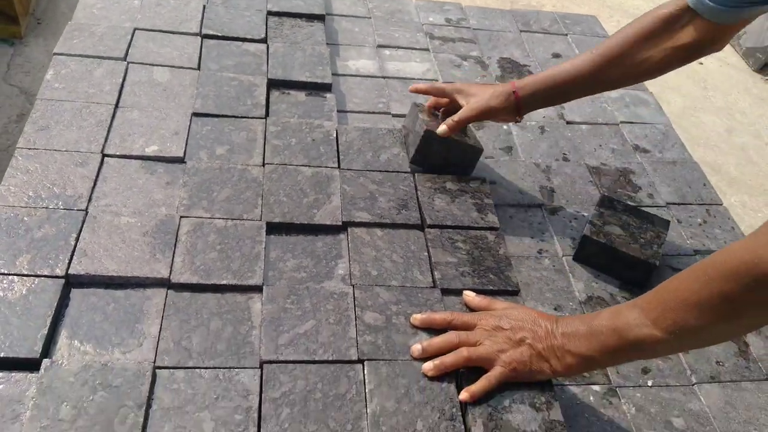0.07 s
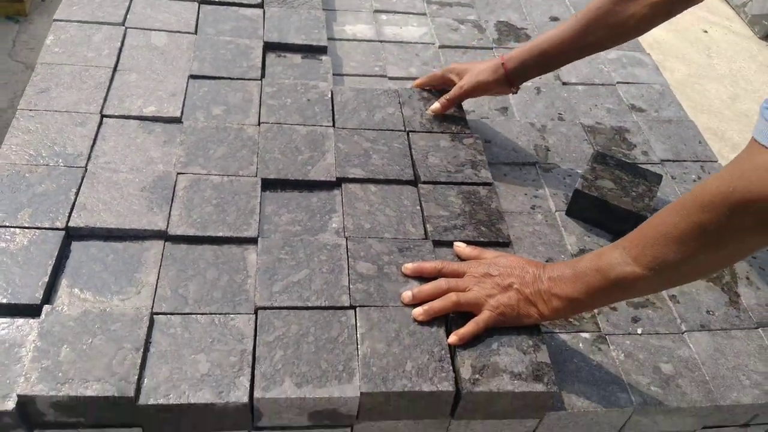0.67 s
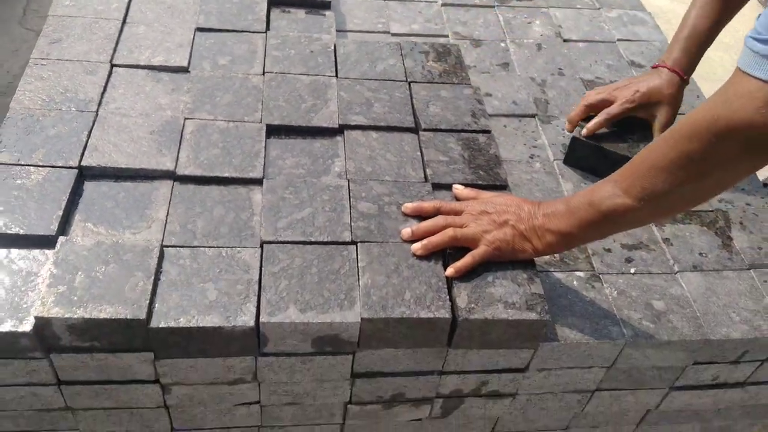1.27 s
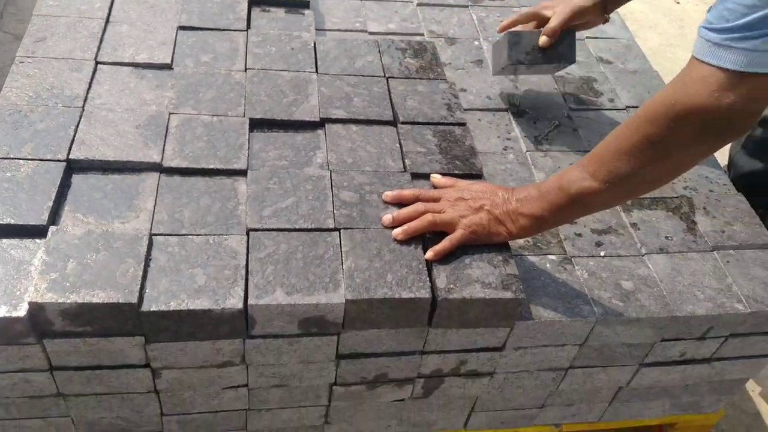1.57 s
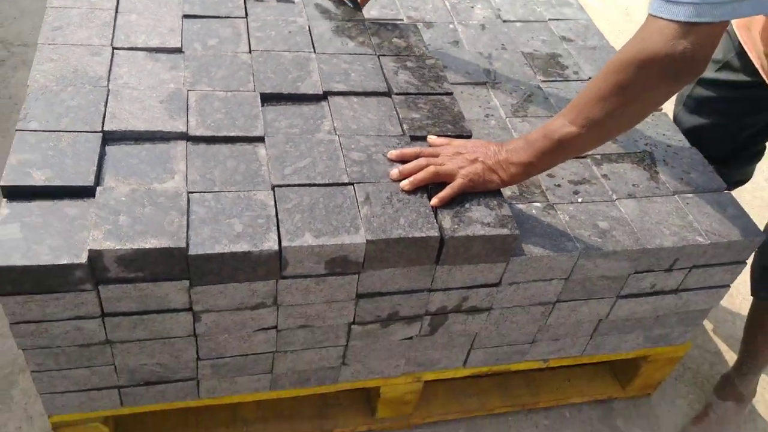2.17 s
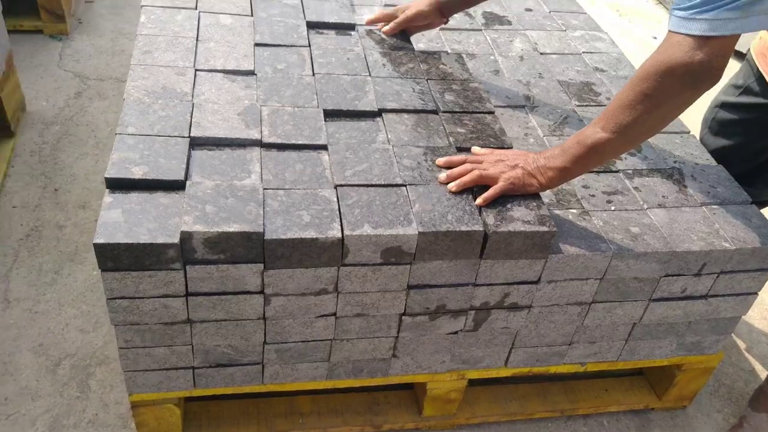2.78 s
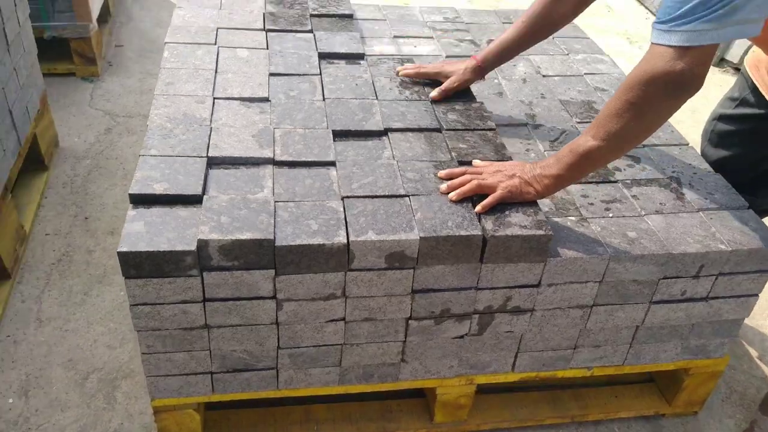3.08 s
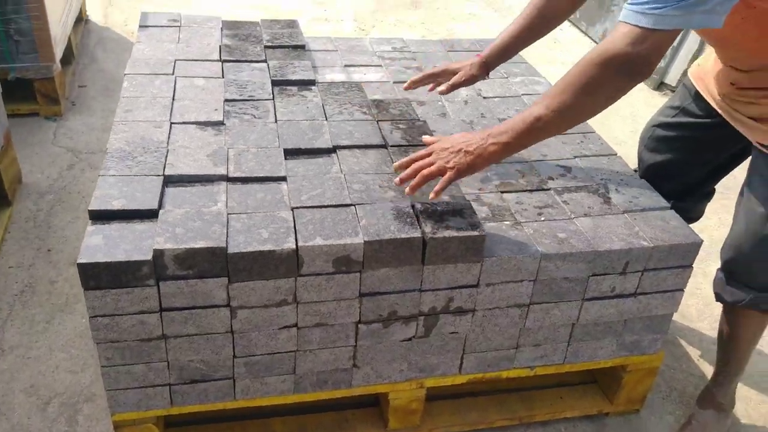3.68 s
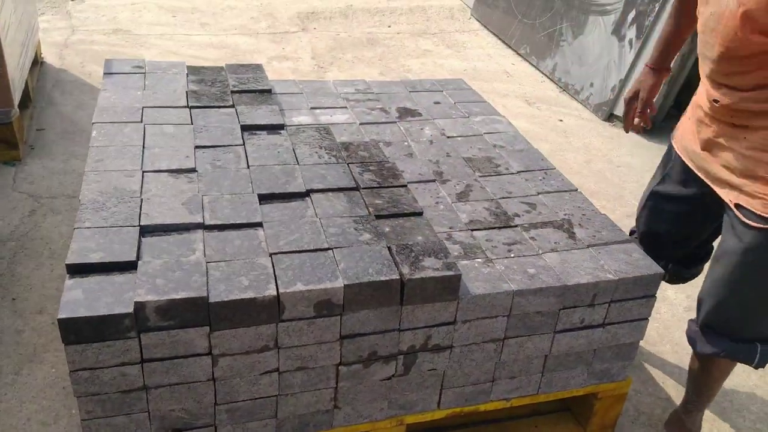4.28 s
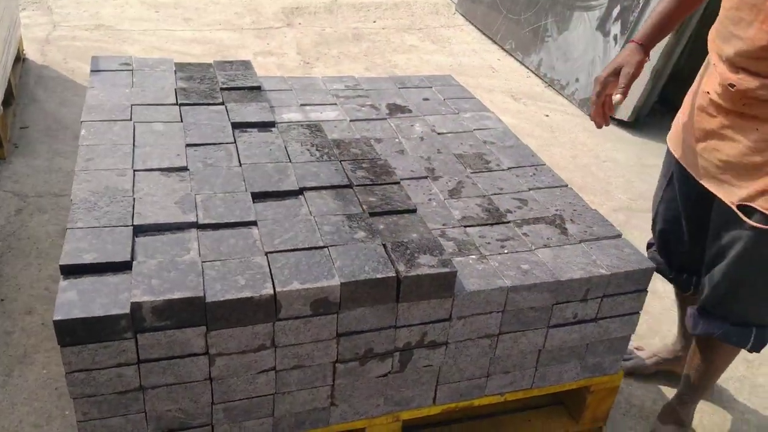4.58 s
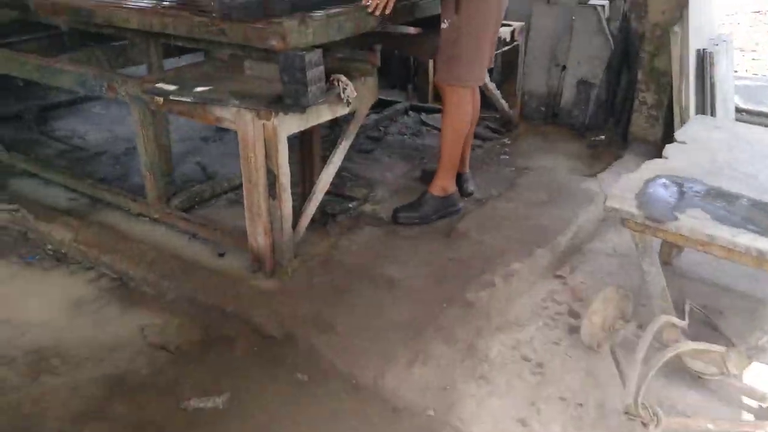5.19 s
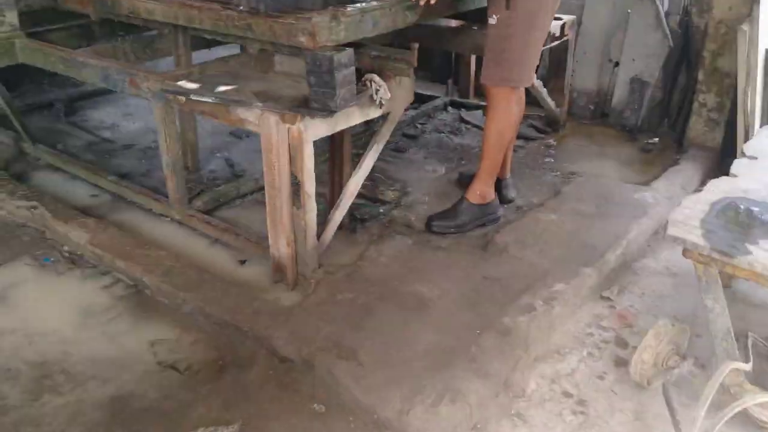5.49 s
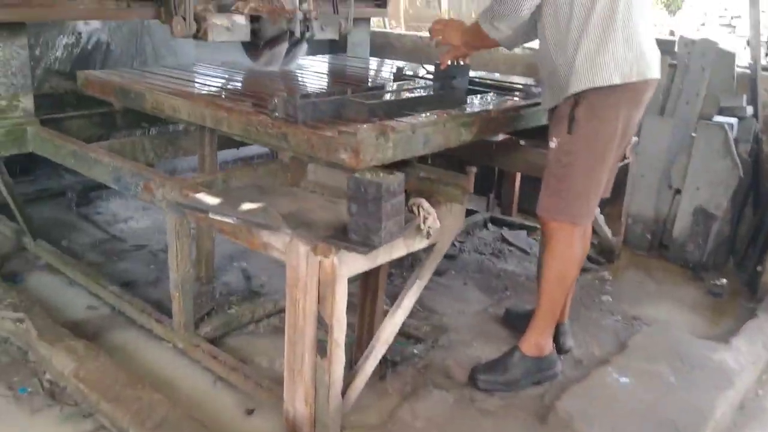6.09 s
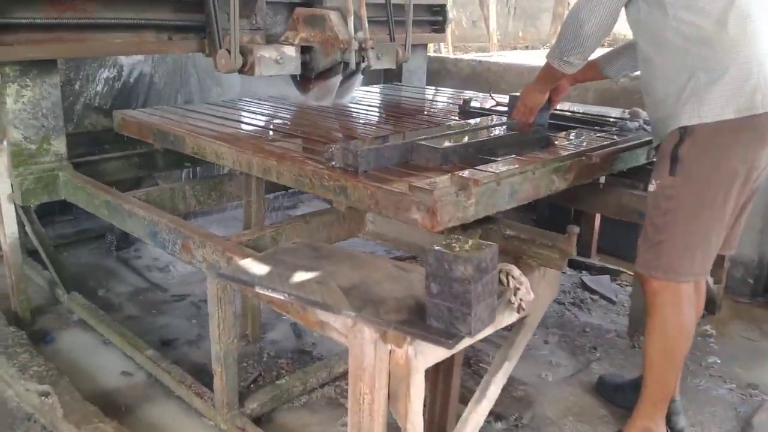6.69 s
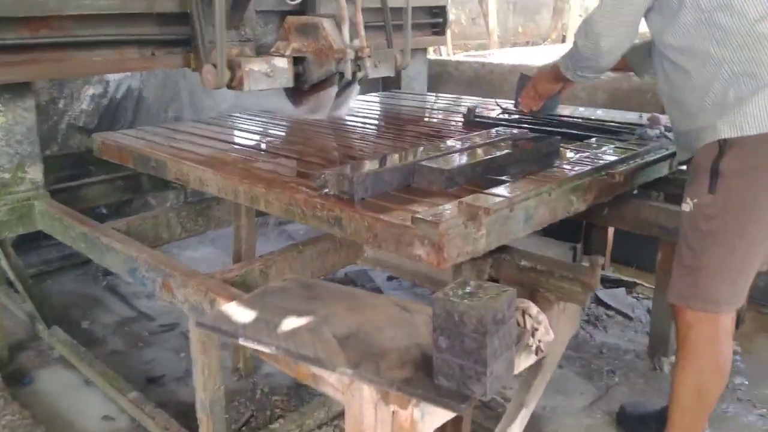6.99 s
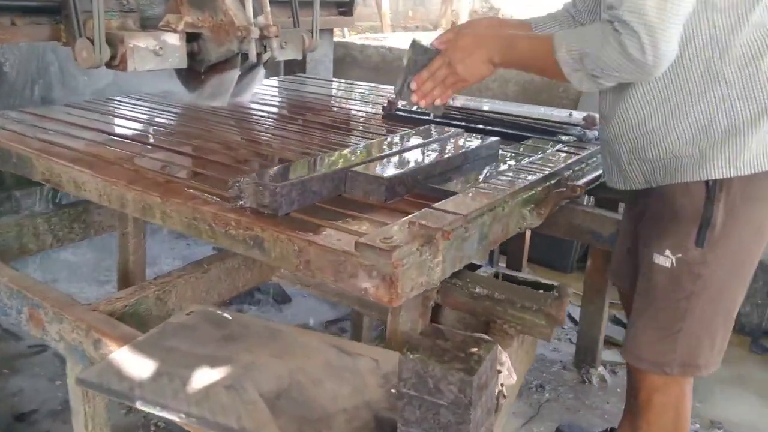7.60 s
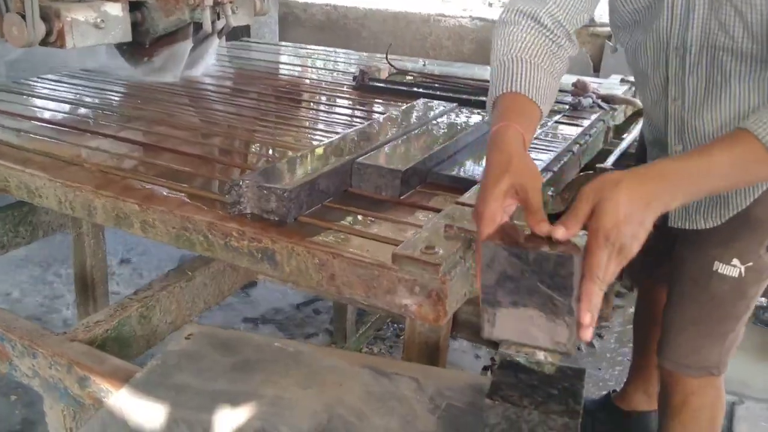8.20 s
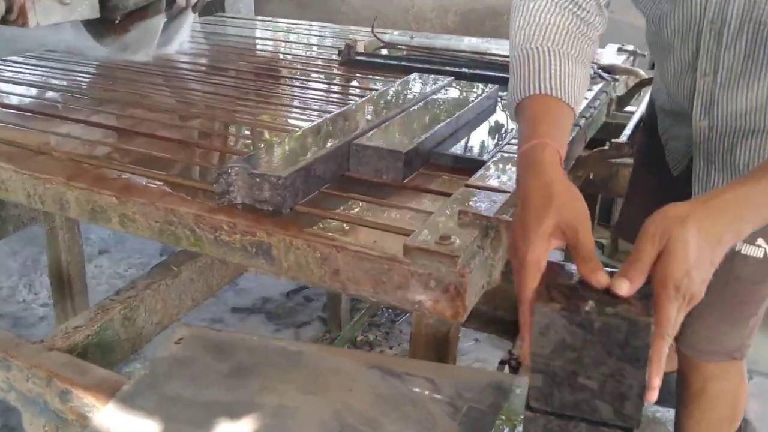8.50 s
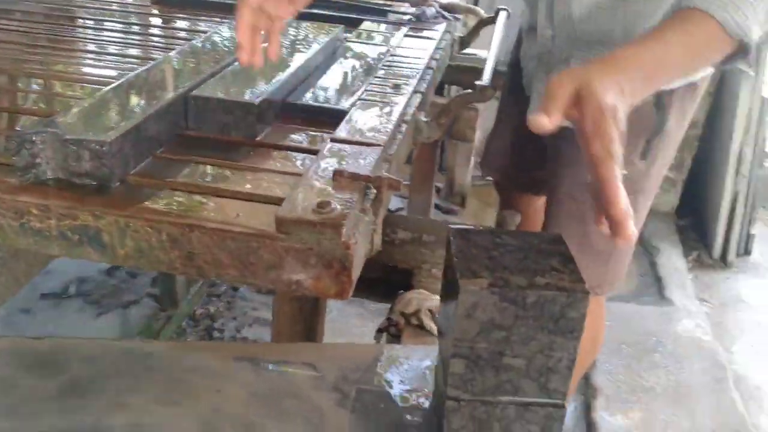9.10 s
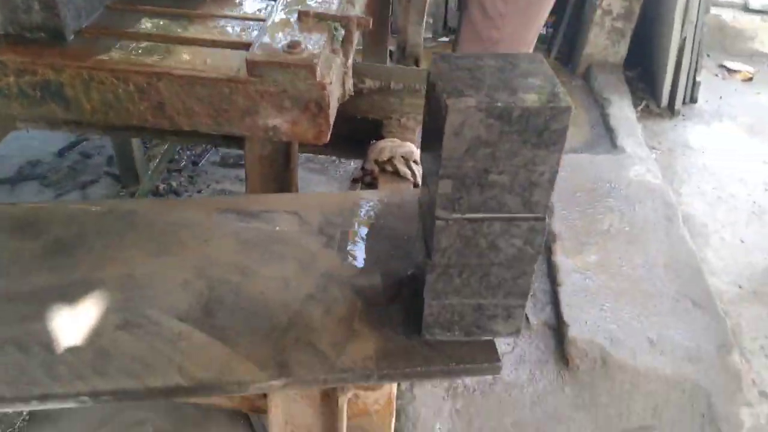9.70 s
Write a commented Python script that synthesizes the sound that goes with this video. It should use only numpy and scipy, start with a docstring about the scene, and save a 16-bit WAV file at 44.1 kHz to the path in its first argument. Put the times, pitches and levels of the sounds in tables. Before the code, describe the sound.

A wet circular saw cuts stone for the whole ten seconds. Its steel blade sings one high, fluttering note that flares into short, irregular squeals several times a second, with a few faint thinner squeaks. Underneath are rasping grit, a mid-pitched drone of worn bearings, a bright water hiss and a faint low rattle and hum. At first it is heard from a yard with slight wind rumble. Stone paving blocks clack at 0.3 seconds, one slides with a brief hiss at 0.8 and taps down, and the loudest clack comes at 2.2. From 4.5 to 5.7 seconds the microphone moves beside the saw in an open shed, with two lighter knocks around 4.8. Grinding and spray are now stronger, surging as the teeth bite. Strong squeals come around 4.3, 6, 6.9 and 9.5 seconds. Two more blocks knock lightly at 9.4 and 9.8 as the cut continues.

```python
"""A wet circular saw cuts stone in an open shed, heard first from the yard. From the start the steel blade
sings near 2.2 kHz and squeals when it binds; grit rasps, worn bearings drone and cooling water hisses off
the rim. In the first seconds paving blocks clack onto a pallet and one slides, over a little wind.
From 4.5 to 5.7 s we move up beside the saw table, where grinding and spray are stronger.
The cut goes on, and two more blocks knock just before the end."""
import sys
import numpy as np
from scipy import signal
from scipy.fft import rfft, irfft
from scipy.io import wavfile
from scipy.ndimage import uniform_filter1d, map_coordinates

SR = 44100
rng = np.random.default_rng(int(sys.argv[2]) if len(sys.argv) > 2 else 0)


def put_to_file(sound):
    """Save the sound as 16-bit audio at rate SR, in the file named by the first command-line argument."""
    columns = np.atleast_2d(sound).T  # one column per channel
    safe = np.clip(columns, -1, 1)
    whole_steps = np.round(safe * 32767)
    wavfile.write(sys.argv[1], SR, whole_steps.astype(np.int16))


N = 434385
TIME = np.arange(N) / SR
FREQ = np.maximum(np.arange(N // 2 + 1) * SR / N, 1)
MOVE_S = (4.5, 5.7)  # start and end of the move from yard to saw table

# A gain_db compares parts of one sound; a level_db says how strong it is before the final limiting.
# the blade's singing between squeals: time_s, level_db
SING_LEVEL = [(0, -27), (.3, -21), (.7, -24.5), (1.1, -23.5), (1.4, -17), (1.8, -32), (2.0, -20.5),
              (2.7, -17), (2.9, -29), (3.3, -29), (3.5, -21), (4.37, -24), (4.6, -21), (5.2, -20),
              (5.7, -25), (6.4, -20.5), (8.0, -18.5), (8.8, -20.5), (9.4, -15.5), (9.7, -24)]
# the blade's note, shifting with the load: time_s, pitch_hz
SING_PITCH = [(0, 2217), (1.0, 2215), (1.3, 2210), (3.15, 2215), (3.6, 2205), (4.1, 2215), (5.4, 2218),
              (6.3, 2213), (7.45, 2212), (7.75, 2224), (8.05, 2215), (8.55, 2223), (9.0, 2214),
              (9.85, 2213)]
# squeals when the blade binds in the slot: start_s, length_s, level_db
SQUEALS = [(0.249, 0.13, -15.5), (0.389, 0.098, -13.5), (0.514, 0.15, -15), (0.733, .17, -15.5),
           (1.231, 0.14, -15.5), (1.88, 0.073, -21), (1.973, 0.025, -13), (2.076, 0.066, -17),
           (2.266, 0.17, -14.5), (2.5, .06, -13), (2.705, 0.13, -17.5), (2.916, 0.12, -17.5),
           (3.057, .11, -14), (3.179, 0.075, -12), (3.325, 0.067, -16.5), (3.432, 0.041, -14.5),
           (3.549, 0.18, -15), (3.88, 0.048, -16), (3.97, 0.094, -14.5), (4.123, 0.066, -16),
           (4.254, 0.098, -9), (4.415, 0.25, -17), (4.565, 0.045, -18), (4.625, .03, -15.5),
           (4.658, 0.044, -12.5), (4.762, 0.031, -12), (4.88, 0.12, -14.5), (5.23, 0.037, -16),
           (5.376, 0.026, -18), (5.745, 0.16, -12.5), (6.018, 0.17, -9.5), (6.485, 0.1, -15.5),
           (6.646, 0.14, -12), (6.845, 0.22, -11), (7.086, 0.087, -16.5), (7.31, .06, -13.5),
           (7.665, 0.22, -14.5), (7.885, 0.26, -16.5), (8.392, 0.051, -17), (8.49, .11, -16.5),
           (9.03, .045, -23), (9.15, 0.12, -16.5), (9.47, .22, -10.5), (9.71, 0.033, -14.5),
           (9.778, 0.13, -13)]
# thin squeaks of the blade: start_s, length_s, level_db, pitch_hz
SQUEAKS = [(3.185, 0.085, -44, 5510), (3.302, 0.04, -46, 5600), (3.53, 0.29, -53, 4447),
           (4.35, .36, -42, 3140), (5.419, .4, -56, 4712), (7.101, 0.2, -52, 4690)]
# strength of each part of the cut: time_s, grinding_db, motor_bearing_db, spindle_bearing_db, spray_db
CUT_LEVELS = [(0, -24.5, -34, -31, -34.5), (.35, -26.5, -35, -33.5, -37.5), (.5, -25.5, -33.5, -31, -35.5),
              (1.8, -25.5, -33.5, -31.5, -35), (2.8, -24.5, -33, -31, -35), (3.27, -27, -40.5, -32, -36),
              (3.43, -24, -33, -29.5, -34), (4.15, -26, -33, -31, -35), (4.68, -24.5, -35.5, -33, -37),
              (4.9, -22, -33.5, -30.5, -31.5), (5.55, -21.5, -31.5, -33, -31.5),
              (5.85, -21.5, -36.5, -32.5, -32.5), (6.4, -21, -34, -29.5, -30),
              (7.0, -23.5, -36, -33.5, -33), (7.45, -18.5, -32.5, -30.5, -29.5),
              (7.85, -22.5, -37.5, -34.5, -34.5), (8.4, -20.5, -33, -32, -31.5),
              (9.1, -21, -33.5, -35.5, -33.5), (9.85, -20, -37, -31, -33)]
# moments when the teeth bite deeper: start_s, length_s, boost_db
BITES = [(4.13, 0.27, 2), (4.406, 0.13, 2.5), (4.86, 0.072, 1), (5.417, 0.14, 2), (5.59, 0.09, 3.5),
         (5.935, 0.095, 2.5), (6.304, 0.2, 2.5), (6.782, 0.13, 2), (7.22, 0.067, 1.5), (7.39, .09, 0.5),
         (7.58, 0.11, 2.5), (7.85, 0.032, 4), (8.018, 0.072, 2), (8.318, .09, 3), (8.453, 0.063, 2),
         (8.718, .08, 1.5), (9.202, 0.035, 3), (9.41, .07, 2), (9.71, 0.084, 2)]
# the blade's modes (its natural notes), rung by grit: pitch_hz, width_hz, gain_db
BLADE_MODES = [(1777, 53, -9.5), (1843, 32, -6), (1939, 26, -3.5), (2060, 52, 1), (2132, 104, -3),
               (2234, 126, -3), (2365, 52, -18)]
# rasp of the teeth in the slot: frequency_hz, gain_db
RASP_SPECTRUM = [(1250, -36), (1500, -8.5), (1660, -8.5), (1850, -9), (2150, 3.5), (2400, -0.5), (2530, -8),
                 (2700, -8.5), (2850, -13), (3130, -18), (3450, -19.5), (4100, -25.5), (5200, -34.5),
                 (7000, -35)]
# faint upper tones of the blade: pitch_hz, gain_db
BLADE_OVERTONES = [(2885, -6), (2985, 1.5), (3105, -20), (4226, -8.5), (4447, -3.5), (4673, -10),
                   (4712, -7)]
# motor bearing tones, with neighbours one shaft turn rate apart: pitch_hz, gain_db
MOTOR_TONES = [(718.7, -17), (734.8, -1.5), (757.7, -1), (773.8, -23), (800.8, 0), (816.9, -2),
               (833.1, -14), (876.1, -2.5), (892.3, -5.5), (908.4, 0)]
# tones of the bearing on the spindle, the blade's shaft: pitch_hz, gain_db
SPINDLE_TONES = [(1057.8, -12), (1074, -4), (1090.1, -9), (1104.9, -7.5), (1114.3, -4), (1131.8, -3),
                 (1152, -0.5), (1174.9, -22), (1219.3, -27), (1228.7, -3), (1246.2, -15.5)]
# noise of the motor bearing's housing: frequency_hz, gain_db
MOTOR_HOUSING = [(540, -14), (660, -13.5), (740, -0.5), (900, 0.5), (970, -11), (1050, -34)]
# noise of the spindle bearing's housing: frequency_hz, gain_db
SPINDLE_HOUSING = [(900, -19.5), (1020, -7.5), (1110, 2.5), (1220, -2), (1300, -6), (1480, -7), (1750, -11)]
# hiss of the water: frequency_hz, gain_db
SPRAY_SPECTRUM = [(3500, -18), (4700, -8.5), (5300, -8), (6000, -5), (6700, -4.5), (7500, -2), (8050, 0),
                  (8500, -2.5), (9100, -6.5), (10800, -5.5), (12200, -3), (13500, -.5), (14600, .9),
                  (15900, 1)]
# ringing of the blade guard: time_s, level_db
GUARD_LEVEL = [(0, -30), (.7, -41), (1.15, -31), (1.7, -39), (2.4, -28), (3.7, -42), (4.2, -29.5),
               (5.4, -30), (5.9, -44), (6.3, -36), (7, -61), (9.85, -42)]
# low tones of the saw frame: pitch_hz, gain_db
FRAME_TONES = [(153.4, 0.5), (253, -3), (272, -29), (309.5, -1.5), (331, -14), (362, 1), (378.2, -14.5),
               (414.5, -1.5), (545, -21), (600, -1.5), (620.4, 3), (669, 1)]
# noise of the rattling frame: frequency_hz, gain_db
RATTLE_SPECTRUM = [(70, -12), (130, -4), (240, -1), (340, 3), (470, -4.5), (600, 4), (800, 3.5),
                   (1200, -26)]
# strength of the frame's rattle: time_s, level_db
RATTLE_LEVEL = [(0, -44), (4.3, -44.5), (4.8, -45), (6.4, -44), (7.3, -46), (8.0, -47.5), (9.85, -46)]
# the motor's hum, which comes and goes from place to place: time_s, level_db
HUM_LEVEL = [(0, -58), (4.6, -58.5), (4.9, -51), (5.5, -45.5), (5.8, -57), (6.35, -45), (7.3, -53),
             (8.3, -49.5), (9.85, -57)]
# stone blocks set down on each other: start_s, level_db, brightness_db_per_octave
KNOCKS = [(.262, -16, 0), (.284, -16, 1), (.910, -27, -2), (2.154, -25, -4), (2.174, -12, -1),
          (2.206, -16, -2), (4.738, -22, -6), (4.890, -25, 0), (9.420, -27, -2), (9.762, -24, 0)]
# ring of one block: pitch_hz, width_hz, gain_db
BLOCK_MODES = [(540, 400, -3.5), (1050, 140, 6.5), (1320, 350, 8.5), (2190, 350, 12.5), (2750, 200, 2)]
# rumble of the wind: frequency_hz, gain_db
WIND_SPECTRUM = [(15, -4.5), (36, -5), (55, -8.5), (100, -14), (200, -35)]
# bands of the saw's sound lifted or lowered at each place: centre_hz, width_hz, yard_db, saw_table_db
PLACE_BANDS = [(893, 45, 2, -1.5), (1176, 43, 2, -1.5), (1830, 78, 1.5, 1.5), (2450, 260, -2, -0.5),
               (3120, 150, 0.5, 0), (8040, 480, 0, 1.5)]


def singing_blade(flutter=0.26, flutter_hz=56, firm_db=-13):
    """The blade sings one note: steady when driven hard, fluttering as the teeth lose their grip."""
    between_squeals = undb(curve(SING_LEVEL) + 1.6 * wander(30))
    level_db = 20 * np.log10(np.maximum(between_squeals, squeals()))
    pitch_hz = curve(SING_PITCH) + 2 * wander(7)
    looseness = np.clip(.45 + .18 * (firm_db - level_db), .3, 2)
    depth = flutter * looseness
    # a complex factor shakes both strength and phase; the divisor keeps the average power steady
    swing = (1 + depth * (wander(flutter_hz) + 1j * wander(flutter_hz))) / np.sqrt(1 + 2 * depth ** 2)
    phase = 2 * np.pi * np.cumsum(pitch_hz) / SR
    return undb(level_db) * np.sqrt(2) * np.real(swing * np.exp(1j * phase))


def squeals(attack_s=0.031, release_s=0.01, arch_db_per_s=15):
    """Strength of the squeals as the blade binds: each catches quickly, arches and lets go."""
    strength = np.zeros(N)
    for start_s, length_s, level_db in SQUEALS:
        age = TIME - start_s
        gate = np.clip(.5 + np.minimum(age / attack_s, (length_s - age) / release_s), 0, 1)
        # longer squeals rise more in the middle
        arch_db = arch_db_per_s * length_s * (arch(start_s, length_s) - 2 / np.pi)
        strength = np.maximum(strength, gate * undb(level_db + arch_db))
    return strength


def squeaks():
    """The blade's side brushes the slot and a high note sounds briefly."""
    return sum(swell(start_s, length_s, level_db) * tones([(pitch_hz, 0)], waver=0.6, waver_hz=56.6)
               for start_s, length_s, level_db, pitch_hz in SQUEAKS)


def grinding(level_db, rasp_db, modes_db=-1.5, overtones_db=-27):
    """Diamond teeth crush grit in uneven spurts, which rasp and ring the blade's other modes."""
    grit = uneven_noise(spread_db=1.1, rate_hz=300)
    # neighbouring modes swing in opposite directions
    modes = sum((-1) ** k * undb(gain_db) * resonate(grit, pitch_hz, width_hz)
                for k, (pitch_hz, width_hz, gain_db) in enumerate(BLADE_MODES))
    modes = signal.sosfilt(signal.butter(2, [1650, 2550], "band", fs=SR, output="sos"), modes)
    rasp = colour(uneven_noise(spread_db=1.24, rate_hz=120), RASP_SPECTRUM)
    overtones = tones(BLADE_OVERTONES, waver=0.98, waver_hz=12)
    mix = undb(modes_db) * unit(modes) + undb(rasp_db) * rasp + undb(overtones_db) * overtones
    return undb(level_db) * mix


def cutting_load():
    """The uneven load as a boost in dB: a surge for each deep bite, plus a small random flicker."""
    bites_db = sum(boost_db * arch(start_s, length_s) for start_s, length_s, boost_db in BITES)
    return bites_db + 0.69 * wander(13)


def bearing(level_db, tone_table, housing_table, tones_db, housing_db):
    """A worn bearing drones in a cluster of close tones over the noise of its housing."""
    drone = undb(tones_db) * tones(tone_table, waver=0.37, waver_hz=6)
    housing = undb(housing_db) * colour(noise(), housing_table)
    return undb(level_db) * (drone + housing)


def water_spray(level_db):
    """Cooling water flies off the rim: a slightly spattering hiss, brighter when it is stronger."""
    hiss = colour(uneven_noise(spread_db=0.9, rate_hz=250), SPRAY_SPECTRUM)
    treble = signal.sosfiltfilt(signal.butter(2, 11500, "high", fs=SR, output="sos"), hiss)
    treble_db = 0.098 * (level_db - np.mean(level_db))
    return undb(level_db) * (hiss + (undb(treble_db) - 1) * treble)


def ringing_steel(level_db, pitch_hz, width_hz):
    """Thin steel is kept ringing by the shaking of the cut."""
    return undb(level_db) * unit(resonate_twice(noise(), pitch_hz, width_hz))


def saw_frame(hum_hz=206.5):
    """The steel frame rattles and hums under the motor."""
    low_tones = undb(-3) * tones(FRAME_TONES, waver=0.46, waver_hz=5)
    rattle = undb(1.5) * colour(noise(), RATTLE_SPECTRUM)
    hum = tones([(hum_hz, 0)], waver=0.32, waver_hz=4.4)
    return undb(curve(RATTLE_LEVEL)) * (low_tones + rattle) + undb(curve(HUM_LEVEL)) * hum


def block_knocks(fade_s=0.056):
    """Stone meets stone: each contact is a short gritty crack that rings the block."""
    out, age = np.zeros(N), np.arange(8192) / SR
    for start_s, level_db, brightness in KNOCKS:
        crack = rng.standard_normal(len(age)) * undb(-60 * age / fade_s)
        clack = 0
        for pitch_hz, width_hz, gain_db in BLOCK_MODES:
            tilt_db = brightness * np.log2(pitch_hz / 1500)
            clack += undb(gain_db + tilt_db) * resonate_twice(crack, pitch_hz, width_hz)
        clack *= undb(level_db) / np.std(clack[:SR // 100])  # the first 10 ms set the level
        start = int(start_s * SR)
        out[start:start + len(age)] += clack[:N - start]
    return out


def sliding_block():
    """A wet block slides with one short, bright hiss."""
    hiss = colour(noise(), [(5000, -8), (10500, -4), (15000, 0)])
    return swell(start_s=0.8, length_s=0.053, level_db=-33) * hiss


def wind():
    """A little wind rumbles, weaker at the saw table."""
    return undb(by_place(yard_db=-53.5, table_db=-58.5)) * colour(noise(), WIND_SPECTRUM)


def by_place(yard_db, table_db):
    """A level that glides from its yard value to its saw table value during the move."""
    return np.interp(TIME, MOVE_S, [yard_db, table_db])


def colour_by_place(saw):
    """Lift or lower a few bands of the saw according to where it is heard from."""
    for centre_hz, width_hz, yard_db, table_db in PLACE_BANDS:
        saw = saw + (undb(by_place(yard_db, table_db)) - 1) * resonate(saw, centre_hz, width_hz)
    return saw


def tones(table, waver, waver_hz, drift_db=2.0):
    """Machine tones, each wavering in strength and phase and swelling slowly on its own."""
    out, coarse_time = np.zeros(N), TIME[::64]
    for pitch_hz, gain_db in table:
        chance = rng.standard_normal((3, 1024))
        size, shift, drift = (np.interp(TIME, coarse_time, glide(points, coarse_time * rate_hz))
                              for points, rate_hz in zip(chance, (waver_hz, waver_hz, 1)))
        phase = 2 * np.pi * (pitch_hz * TIME + rng.random())
        tone = (1 + waver * size) * np.sin(phase) + waver * shift * np.cos(phase)
        out += undb(gain_db + drift_db * drift) * tone
    return unit(out)


def colour(x, spectrum):
    """Shape x with (frequency_hz, gain_db) points, fading beyond both ends; the result has power 1."""
    hz, db = np.transpose(sorted(spectrum))
    edges = np.minimum(FREQ / hz[0], 1) ** 2 * np.minimum(hz[-1] / FREQ, 1) ** 2
    gain = undb(np.interp(np.log(FREQ), np.log(hz), db))
    return unit(irfft(rfft(x, N) * edges * gain, N))


def resonate(x, pitch_hz, width_hz):
    """Keep the band of x around one pitch, so that it rings."""
    return signal.lfilter(*signal.iirpeak(pitch_hz, pitch_hz / width_hz, fs=SR), x)


def resonate_twice(x, pitch_hz, width_hz):
    """Two passes give a purer ring."""
    return resonate(resonate(x, pitch_hz, width_hz), pitch_hz, width_hz)


def noise():
    """White noise: an even hiss."""
    return rng.standard_normal(N)


def uneven_noise(spread_db, rate_hz):
    """Hiss whose level flickers at random."""
    return noise() * undb(spread_db * wander(rate_hz))


def wander(rate_hz):
    """A smooth random curve of typical size 1 that changes about rate_hz times a second."""
    return unit(glide(rng.standard_normal(4096), TIME * rate_hz))


def glide(points, positions):
    """Read smoothly between the points of a list."""
    return map_coordinates(points, [positions], order=2, mode="wrap")


def arch(start_s, length_s):
    """Half a sine wave: from 0 up to 1 and back."""
    return np.sin(np.pi * np.clip((TIME - start_s) / length_s, 0, 1))


def swell(start_s, length_s, level_db):
    """Strength of a short, rounded swell."""
    return undb(level_db) * np.sqrt(arch(start_s, length_s).clip(0))


def curve(table, column=1):
    """Join the values in one column of a timed table with straight lines."""
    columns = np.transpose(table)
    return np.interp(TIME, columns[0], columns[column])


def undb(db):
    """Turn decibels into a multiplier."""
    return 10 ** (np.asarray(db) / 20)


def unit(x):
    """Scale x to an average power of 1."""
    return x / np.sqrt(np.mean(np.abs(x) ** 2))


def limit(x, ceiling_db, window_s):
    """Turn the sound down wherever its level over window_s nears the ceiling."""
    power = uniform_filter1d(x ** 2, int(window_s * SR), axis=-1)
    return x * (1 + (power / undb(ceiling_db) ** 2) ** 4) ** (-1 / 8)


def scene():
    """Saw, water, blocks and wind in mono; the load makes grinding, bearings and spray surge together."""
    load_db = cutting_load()
    grind_db, motor_db, spindle_db, spray_db = (curve(CUT_LEVELS, k) + load_db for k in (1, 2, 3, 4))
    motor = bearing(motor_db, MOTOR_TONES, MOTOR_HOUSING, by_place(-0.5, -1), housing_db=-5.5)
    spindle = bearing(spindle_db, SPINDLE_TONES, SPINDLE_HOUSING, by_place(-3, -3.5), housing_db=-0.37)
    guard = ringing_steel(curve(GUARD_LEVEL) - 7.5, pitch_hz=1392, width_hz=16)
    high_blade_mode = ringing_steel(grind_db - 24.5, pitch_hz=3124, width_hz=103)
    blade = singing_blade() + squeaks() + grinding(grind_db, rasp_db=by_place(-1, -4)) + high_blade_mode
    saw = blade + motor + spindle + guard + saw_frame() + water_spray(spray_db)
    return (colour_by_place(saw) + sliding_block() + wind() + block_knocks())[None]


def record(dry, top_hz=15700):
    """Turn everything down under long squeals, round off the short ones, then cut the highest treble."""
    ducked = limit(dry, ceiling_db=-13.5, window_s=0.084)
    rounded = limit(ducked, ceiling_db=-12.0, window_s=0.0033)
    return signal.sosfilt(signal.ellip(14, .2, 60, top_hz, fs=SR, output="sos"), rounded)


dry = scene()
out = record(dry)
put_to_file(out)
```